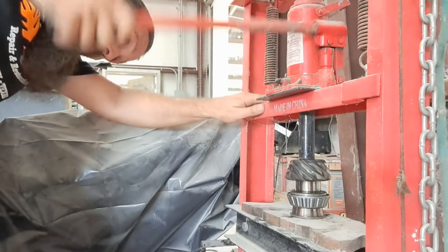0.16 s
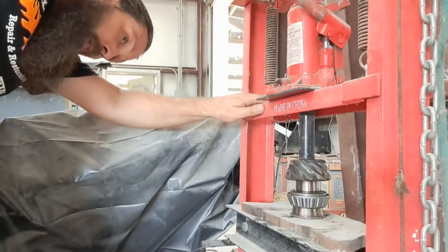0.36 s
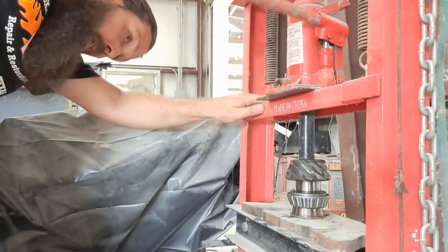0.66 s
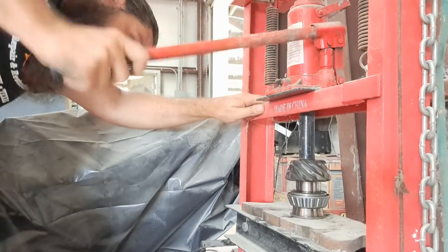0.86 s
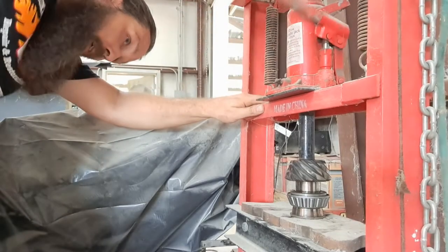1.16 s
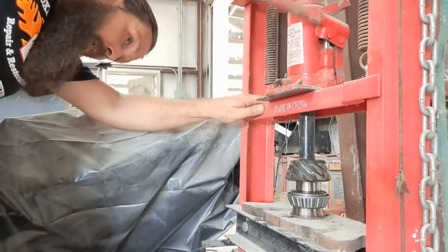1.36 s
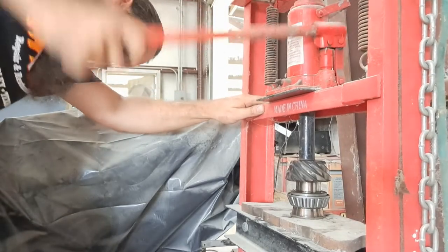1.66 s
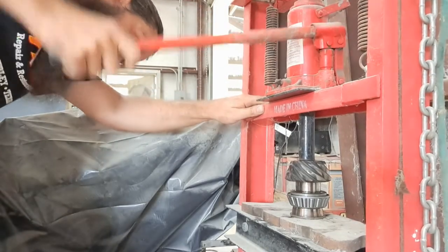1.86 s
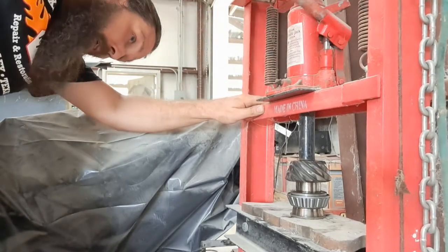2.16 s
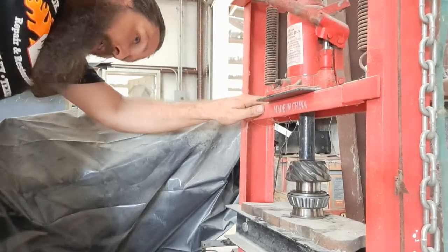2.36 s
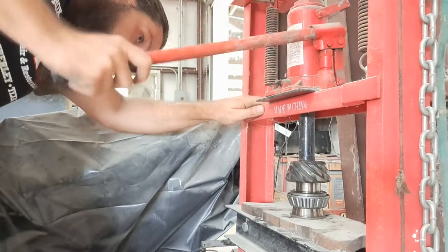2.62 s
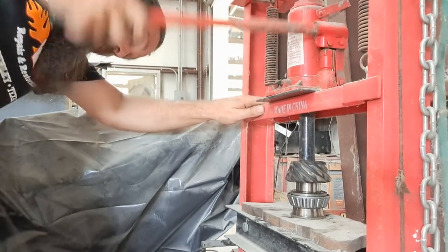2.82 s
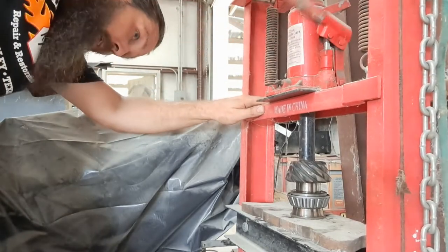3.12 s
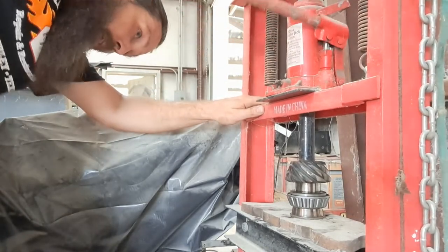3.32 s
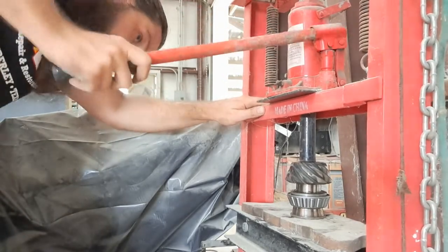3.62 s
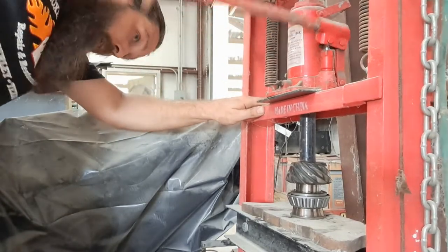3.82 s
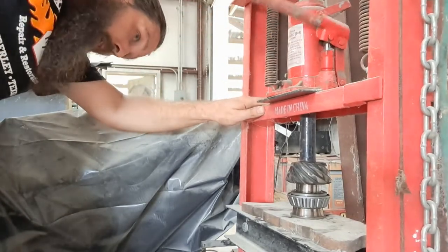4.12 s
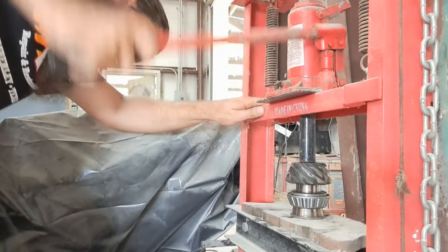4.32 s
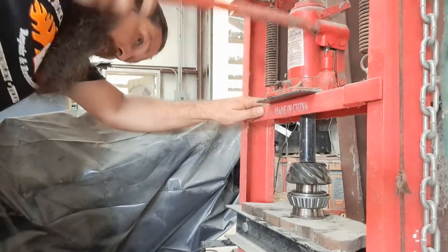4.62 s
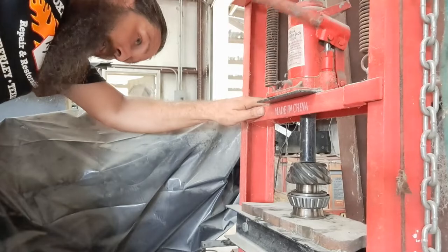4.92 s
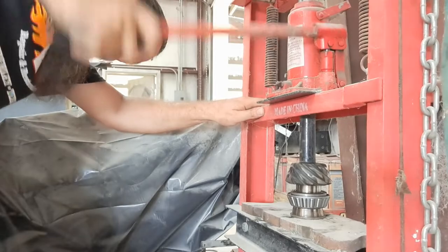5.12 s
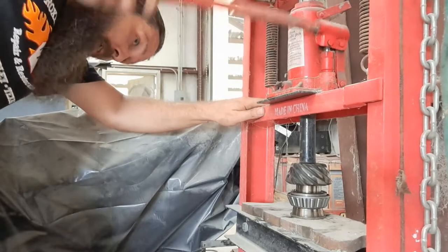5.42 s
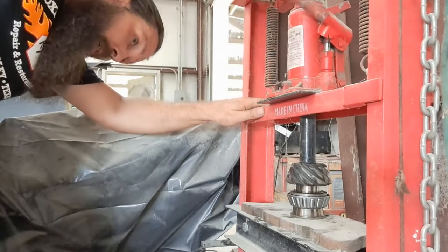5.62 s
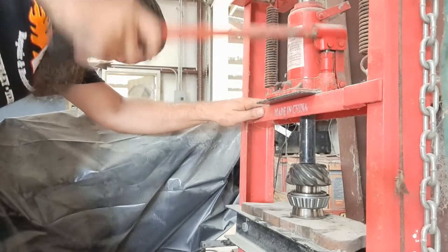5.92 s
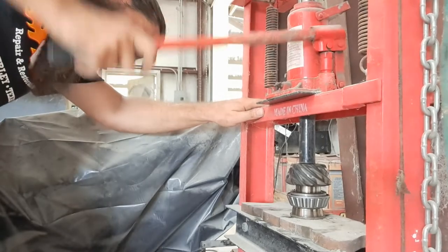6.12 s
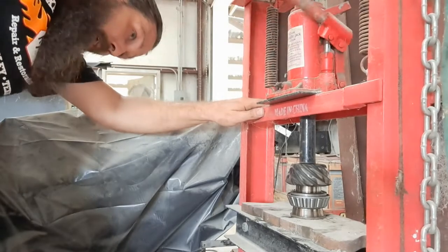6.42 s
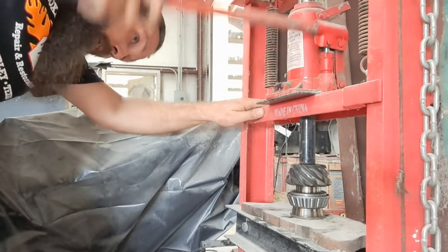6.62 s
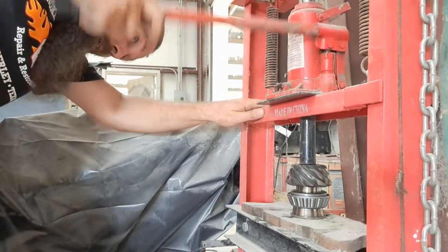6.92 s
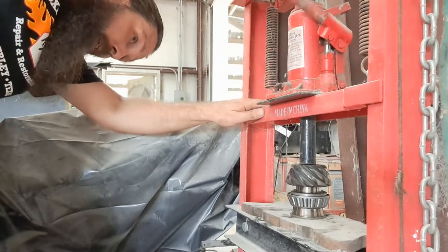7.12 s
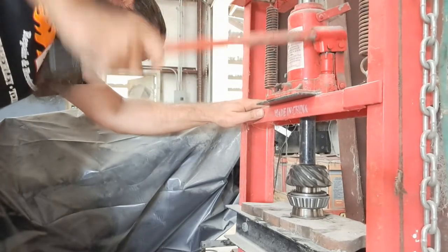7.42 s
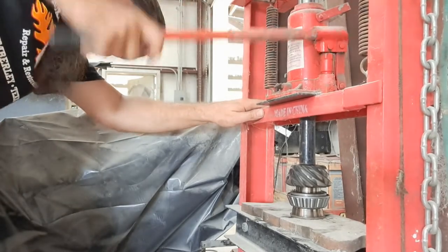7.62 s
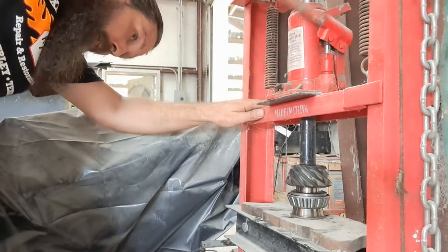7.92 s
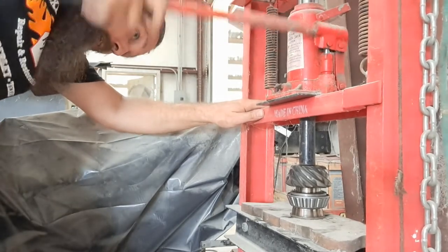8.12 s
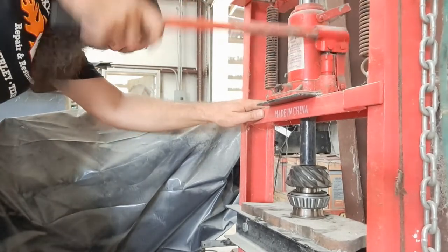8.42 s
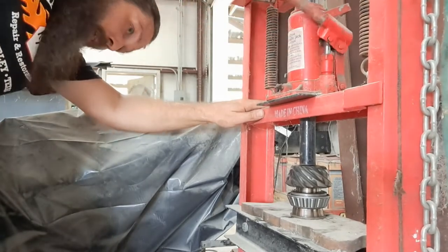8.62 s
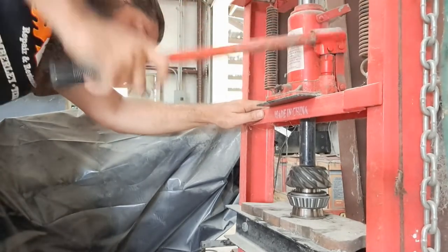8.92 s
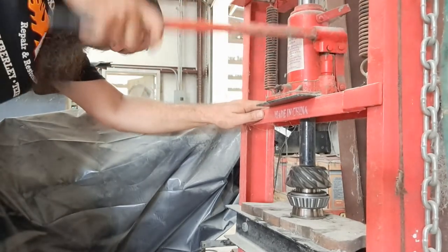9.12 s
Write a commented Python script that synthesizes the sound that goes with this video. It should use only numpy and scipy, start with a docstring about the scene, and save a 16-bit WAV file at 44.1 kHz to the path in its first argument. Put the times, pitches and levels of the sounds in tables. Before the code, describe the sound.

A low fan rushes and hums with wavering tones throughout, in a workshop heard close in stereo. Loose steel handle taps open the sound, a clear one at 0.2 s and a sharp, bright one near 0.9 s, with a hollow pump knock at 0.56 s. Knocks follow at 1.4, 2.3 and 3.2 s, each with a short scrape and, on these light strokes, a small rebound. Faint paired pin ticks come between, and single light frame clacks with a soft low thump land at 1.7, 2.6 and 3.55 s. At 4.3 s the clack doubles and hardens. From 5 s on, loud bursts of two to four steel jolts hit around 5.1, 5.9, 6.7, 7.4, 8.1 and 8.9 s, rattling brightly and ringing briefly, with quieter scrape, knock and ticks between them. A last faint pin tick comes near 9.2 s.

```python
"""A loose handle taps its socket over a fan's hum: a bottle jack in a steel shop press, pumped by hand,
heard close by in a workshop through two microphone ports.
Each stroke: the handle scrapes up, the pump knocks at the top, the push makes the frame clack, two pins tick.
As the load builds, one light clack a stroke becomes two to four loud jolts.
Contacts are shaped noise with decaying steel modes; the fan is rushing noise and wavering tones."""
import sys
import numpy as np
from scipy import signal
from scipy.fft import rfft, irfft
from scipy.io import wavfile

SR = 44100
rng = np.random.default_rng(int(sys.argv[2]) if len(sys.argv) > 2 else 0)


def generate_wav(sig):
    """Save sig (samples, or channels by samples) to the path in sys.argv[1] as 16-bit PCM at SR."""
    pcm = np.round(np.clip(np.atleast_2d(sig).T, -1, 1) * 32767).astype(np.int16)
    wavfile.write(sys.argv[1], SR, pcm)


N = 408366  # samples in the scene
LENGTH = 5 * 2 ** 13  # samples in one contact sound
AGE = np.arange(LENGTH) / SR  # seconds since the contact began
HZ = np.maximum(np.fft.rfftfreq(LENGTH, 1 / SR), 1)


# Share of the full load on the ram. Each row: time in seconds, share from 0 to 1.
RAM_LOAD = [(0, 0), (3.3, 0), (4.3, .3), (5.1, .55), (9.26, 1)]


def load_at(s):
    """Share of the full load on the ram at a time."""
    return np.clip(np.interp(s, *np.transpose(RAM_LOAD)), 0, 1)


# Frame jolts on the down strokes. Each row: start in seconds, level in dB before the layer's gain,
# bass boost in dB, treble boost in dB, contact in seconds.
FRAME_JOLTS = [(1.717, -26.5, -9, 0.5, 0.011), (2.634, -25, -7, 0.5, .0051), (3.55, -20.5, -3, 4.5, 0.027),
               (4.29, -17.5, -3.5, 4.5, 0.0088), (4.348, -16.5, -0.5, 2.5, 0.019),
               (5.041, -12.5, 1.5, 4.5, 0.016), (5.117, -10, 1, -1, 0.013),
               (5.185, -13.5, -1.5, -2.5, .017), (5.84, -10.5, -4, -5.5, 0.0098),
               (5.919, -16.5, 1.5, -1.5, 0.0097), (5.957, -12.5, -6.5, -3, 0.021),
               (6.591, -14, -0.5, -1, 0.027), (6.646, -12, -2.5, -2, .02), (6.714, -14.5, 3.5, 2.5, 0.0072),
               (6.755, -9.5, -6.5, -3, 0.0046), (7.362, -9.5, 0, 1, 0.011), (7.435, -10, -2, -2, 0.0069),
               (8.073, -8, -6, -5, 0.0047), (8.161, -16, -4.5, -2.5, .019), (8.222, -11.5, -4, -2.5, .0082),
               (8.804, -11.5, -3, -5, .016), (8.881, -13.5, 1, -1, 0.016), (8.947, -8, -8, -4.5, 0.0026)]
# Colour of a jolt. Each row: frequency in Hz, relative density in dB per Hz.
JOLT_COLOUR = [(110, -25), (180, -7), (394, 0), (493, -5.5), (652, -4.5), (756, -1.5), (928, -7),
               (1060, -6.5), (3620, -16.5), (4200, -17), (4530, -16.5), (5660, -19.5), (10100, -32.5),
               (11700, -27), (15500, -42.5)]
# Colour of the thump under it. Each row: frequency in Hz, relative density in dB per Hz.
THUMP_SPECTRUM = [(30, -32), (55, -11.5), (77, 2), (100, -3.5), (160, -4.5), (230, -10.5), (500, -53),
                  (1500, -84)]
SLACK_THUMP_DB, LOADED_THUMP_DB = -2, -24.5  # the load damps the thump; each jolt's bass boost is added
THUMP_T60_S = 0.73
BOOM_DB, BOOM_HZ, BOOM_T60_S = -26, 790, 1.4
RATTLE_HZ, RATTLE_RISE_S = 1800, 0.046


def frame_clacks(press):
    """The loaded frame jolts with a thump, its loose steel rattles an instant later, and the beams boom on."""
    out = np.zeros((2, N))
    low = signal.butter(2, BOOM_HZ, fs=SR, output="sos")
    dull = signal.butter(1, RATTLE_HZ, fs=SR, output="sos")
    for s, db, bass_db, treble_db, contact in FRAME_JOLTS:
        colour = at_hz(JOLT_COLOUR, HZ)
        colour = colour + bass_db * (1 - shelf(900)) + treble_db * shelf(3500)
        hit = blow(press, colour, contact, attack=.0025, t60=0.18, modes_db=-5.5,
                   room_db=-10.0, grain_db=0.5, crack_db=-1.0)
        # the hit starts dull, and its treble rattle fades in
        late_rattle = hit - signal.sosfilt(dull, hit)
        hit = hit - late_rattle * dying(RATTLE_RISE_S)

        boom_noise = signal.sosfilt(low, stereo_noise(LENGTH))
        boom = coloured(boom_noise * dying(BOOM_T60_S), colour)
        thump = coloured(stereo_noise(LENGTH) * dying(THUMP_T60_S), at_hz(THUMP_SPECTRUM, HZ))
        thump_db = bass_db + np.interp(load_at(s), [0, 1], [SLACK_THUMP_DB, LOADED_THUMP_DB])
        add(out, s, from_db(db) * (hit + from_db(BOOM_DB) * boom + from_db(thump_db) * thump))
    return out


# Colour of the pump's knock. Each row: frequency in Hz, relative density in dB per Hz.
PUMP_KNOCK_COLOUR = [(320, -12.5), (550, -27), (809, 1), (1180, -8), (1500, -2), (1730, -1), (1990, -9.5),
                     (2460, -22), (3530, -16), (5700, -51), (6490, -32), (9000, -26.5), (11700, -96),
                     (19800, -120)]
# The pump body's ring after its knock. Each row: frequency in Hz before a slight random detuning,
# relative level in dB, t60 in seconds.
PUMP_BODY_MODES = [(815, -11.5, .25), (968, -21, 0.39), (1475, -4.5, 0.22), (1960, -11, .2)]


def knock(press):
    """A hollow, dull knock that leaves the pump body ringing."""
    colour = at_hz(PUMP_KNOCK_COLOUR, HZ) + 9 * (1 - shelf(600)) ** 2 - 4 * shelf(2600)
    sound = blow(press, colour, contact=0.0044, attack=0.00046, t60=0.17, modes_db=-13.5,
                 room_db=-11.5, grain_db=1.0, crack_db=-3.0)
    for hz, db, t60 in PUMP_BODY_MODES:
        detuned_hz = hz * rng.normal(1, 0.0072)
        sound = sound + from_db(db) * dying(t60) * np.sin(2 * np.pi * detuned_hz * AGE)
    return sound


# Lifts of the handle, played by the knocks and the scrapes, levels before each layer's gain.
# Each row: time at the top in seconds, knock level in dB, slide before the top in seconds,
# scrape level in dB, scrape's treble boost in dB, first touch before the slide in seconds.
HANDLE_LIFTS = [(.558, -26.5, 0.033, -35, 6, 0.0054), (1.398, -26.5, 0.052, -31, -2, 0.016),
                (2.305, -28.5, 0.04, -24.5, 1, 0.03), (3.204, -24, 0.037, -27.5, 0, 0.029),
                (4.135, -26, 0.023, -26.5, -2, 0.043), (4.943, -25.5, 0.029, -27.5, 0, 0.011),
                (5.733, -24.5, 0.021, -25.5, 1.5, .034), (6.517, -26, 0.021, -24.5, -1, 0.017),
                (7.257, -25.5, 0.026, -29, 1.5, 0.0092), (7.99, -23.5, 0.027, -27.5, 0.5, .012),
                (8.75, -28.5, 0.011, -37.5, -3, 0.026)]
QUICK_FROM_S, QUICK_TO_S = 1, 3.5  # the quick, unloaded strokes
REBOUND_S, REBOUND_DB = .072, -7  # delay and level against the knock


def pump_knocks(press):
    """The pump knocks at the top of every lift, and bounces once after it on the quick strokes."""
    out = np.zeros((2, N))
    for s, db, *_ in HANDLE_LIFTS:
        add(out, s, from_db(db) * knock(press))
        if QUICK_FROM_S < s < QUICK_TO_S:
            add(out, s + REBOUND_S, from_db(db + REBOUND_DB) * knock(press))
    return out


# Colour of a light steel touch. Each row: frequency in Hz, relative density in dB per Hz.
TOUCH_COLOUR = [(320, -5), (550, -7), (780, -4), (1080, -6.5), (1380, -4), (1550, -7), (2250, -3.5),
                (2520, -5), (5290, -6), (6340, -12), (9910, -13.5), (10900, -8), (15500, -18.5)]


def clink(press, ping_db, top_db, contact, t60):
    """One light touch of steel on steel; a longer contact swells into a scrape."""
    ping_band = shelf(3000) - shelf(6500)
    colour = at_hz(TOUCH_COLOUR, HZ) + ping_db * ping_band + top_db * shelf(6500)
    colour = colour + 2.36 * ripple(161.8)  # each touching spot favours a few broad pitches
    return blow(press, colour, contact, attack=0.099 * contact, t60=t60, modes_db=-7.5,
                room_db=-14.5, grain_db=4.5, crack_db=-16.0)


# Pin ticks as the handle turns at the bottom. Each row: start in seconds,
# level in dB before the layer's gain, gap to the second pin in seconds.
PIN_TURNS = [(1.109, -42.5, .012), (1.882, -32.5, .021), (2.775, -35, 0.032), (3.727, -29.5, 0.072),
             (4.54, -34.5, 0.013), (5.366, -31.5, 0.047), (6.161, -29.5, 0.034), (6.9, -28, .034),
             (7.636, -35.5, 0.053), (8.41, -35, 0.046), (9.166, -33.5, 0.028)]
# Loose taps of the handle in its socket. Each row: start in seconds, level in dB before the layer's gain,
# boost in dB around 3 to 6 kHz, boost in dB above that.
LOOSE_TAPS = [(0.024, -32, -20, -24), (.082, -39, -11, -19), (0.137, -42, 2, -6), (.166, -34.5, 3, 5),
              (.196, -18, 7.5, -5), (0.452, -47, 20, -4), (.549, -24.5, 6, -17), (0.856, -27, -1, -20),
              (.873, -12, -1, 8.5), (.996, -32.5, 4, -19), (1.387, -19.5, 4, 7), (1.923, -28.5, 0, -7),
              (1.965, -26, 0, -4.5), (2.286, -20.5, -10, 2), (2.876, -26, -3, -7.5), (4.617, -23, 4.5, 3),
              (8.446, -28, -3, -3)]
FIRST_TOUCH_DB = -14  # against the scrape
RUB_SHARE = 0.38  # the handle rubs for this share of the slide
PIN_T60_S, SECOND_PIN_DB = .065, -2


def socket_clinks(press):
    """The handle slides in its socket on every lift, ticks two pins at every turn, and at times taps loosely."""
    out = np.zeros((2, N))
    for top, _, slide, db, top_db, slack in HANDLE_LIFTS:
        # a faint touch takes up the slack before each scrape
        touch = clink(press, ping_db=-3, top_db=top_db - 12.5, contact=0.011, t60=.2)
        scrape = clink(press, ping_db=-2.5, top_db=top_db, contact=RUB_SHARE * slide, t60=0.16)
        add(out, top - slide - slack, from_db(db + FIRST_TOUCH_DB) * touch)
        add(out, top - slide, from_db(db) * scrape)
    for s, db, gap in PIN_TURNS:
        first = clink(press, ping_db=9, top_db=-0.5, contact=0.0021, t60=PIN_T60_S)
        second = clink(press, ping_db=1, top_db=-1.5, contact=0.0046, t60=PIN_T60_S)
        add(out, s, from_db(db) * first)
        add(out, s + gap, from_db(db + SECOND_PIN_DB) * second)
    for s, db, ping_db, top_db in LOOSE_TAPS:
        add(out, s, from_db(db) * clink(press, ping_db, top_db, contact=0.0024, t60=0.12))
    return out


# Clear modes of the steel press. Each row: frequency in Hz, relative level in dB, t60 in seconds.
STEEL_MODES = [(303, -25, .9), (350, -26, .5), (397, -27, .9), (463, -32, 1.1), (573, -22, .3),
               (700, -29, .7), (756, -16.5, .3), (871, -21, .35), (1081, -24, .25), (1324, -24, .3),
               (1545, -21, .35), (1185, -28, .75), (1630, -30, .7), (1790, -25, .5), (2137, -28, .55),
               (2369, -19.5, .35), (3026, -20, .28), (3874, -20, .25), (4305, -15, .25), (4701, -17, .25),
               (5113, -15.5, .25), (5590, -17, .2), (5718, -14.5, .22), (6140, -18, .2), (6256, -14, .22),
               (6686, -16, .22), (7403, -15, .25), (7784, -16.5, .22), (13810, -14, .3)]


def steel():
    """The press's own ring: a thicket of short resonances, and the clear modes as each port hears them."""
    hz, db, t60 = np.transpose(STEEL_MODES)
    # the ports' phases part towards the treble
    spread = np.minimum(hz / 3500, 1) * rng.choice([-1, 1], len(hz))
    phase = rng.uniform(0, 2 * np.pi, len(hz)) + np.array([spread, -spread])
    decay = np.array([from_db(level) * dying(t) for level, t in zip(db, t60)])
    modes = np.sqrt(2) * decay * np.sin(2 * np.pi * hz[:, None] * AGE + phase[:, :, None])
    thicket_db = 3.5 * ripple(34)
    return thicket_db, modes.astype(np.float32)


ROOM_T60_S, WALL_CUT_HZ = 0.56, 12400


def blow(press, colour_db, contact, attack, t60, modes_db, room_db, grain_db, crack_db):
    """Steel chatters on steel and seats with a crack; the frame rings on and the room answers."""
    thicket_db, modes = press
    # tiny impacts, under a millisecond apart, roughen the start
    impacts = np.repeat(rng.standard_normal(LENGTH // 32), 32)
    roughness = rms_one(from_db(grain_db * impacts))
    grain = 1 + (roughness - 1) * dying(0.14, contact)
    dense = stereo_noise(LENGTH) * grain * dying(t60, contact)

    damping = np.exp(-2 * np.pi * WALL_CUT_HZ / SR)
    room = signal.lfilter([1 - damping], [1, -damping], stereo_noise(LENGTH))
    room = room * dying(ROOM_T60_S)

    # every blow lands in another place and wakes the resonances in other proportions
    count = len(STEEL_MODES)
    strengths = from_db(modes_db) * rng.uniform(.5, 1.4, count) * rng.choice([-1, 1], count)
    clear_ring = strengths.astype(np.float32) @ modes
    place_db = 2.5 * ripple(88.9)
    ringing = dense + from_db(room_db) * room + clear_ring
    ringing = ringing * (1 - np.exp(-AGE / max(attack, 1e-4)))

    # the crack reaches both ports straight from the contact, untouched by the frame's resonances
    crack = rng.standard_normal(LENGTH) * dying(0.0062, contact / 2) * (AGE > contact / 2)
    return coloured(ringing, colour_db + thicket_db + place_db) + from_db(crack_db) * coloured(crack, colour_db)


# Rushing air of the fan. Each row: frequency in Hz, relative density in dB per Hz.
FAN_AIR = [(25, -25), (40, -26), (55, 1.5), (75, 3), (100, -7), (125, -4.5), (200, -10.5), (270, -7),
           (330, -7.5), (400, -12.5), (620, -22.5), (850, -19.5), (1100, -32.5), (15500, -53)]
# Motor tones of the fan. Each row: frequency in Hz, rms level in dB before wavering.
FAN_TONES = [(59.2, -50), (118.4, -54), (269.2, -46.5), (296.1, -49), (323, -50.5), (347, -63.5)]
AIR_DB = -41  # rms
WAVER = 0.53  # spread of the random swell, and of the phase slip before its factor of 3


def workshop():
    """A fan behind the press: low rushing air and a few wavering motor tones."""
    air_gain = from_db(at_hz(FAN_AIR, np.fft.rfftfreq(N, 1 / SR)))
    air = irfft(rfft(stereo_noise(N)) * air_gain, N)
    t = np.arange(N) / SR
    knots = np.linspace(0, t[-1], 50)
    hum = 0
    for hz, db in FAN_TONES:
        swell = np.interp(t, knots, WAVER * rng.standard_normal(len(knots)))
        slip = np.interp(t, knots, WAVER * rng.standard_normal(len(knots)))
        tone = np.sin(2 * np.pi * hz * t + 3 * slip)
        hum = hum + np.sqrt(2) * from_db(db) * (1 + swell) * tone
    return from_db(AIR_DB) * rms_one(air) + hum


# Width at the microphone ports. Each row: frequency in Hz, side minus mid in dB.
PORT_WIDTH = [(60, -21), (300, -8.5), (750, -7.5), (1200, -3), (2200, 0.5), (15000, 1)]


def stereo_noise(size):
    """White noise, alike at both ports in the bass and diffuse in the treble."""
    mid, side = rng.standard_normal((2, size))
    side_gain = from_db(at_hz(PORT_WIDTH, np.fft.rfftfreq(size, 1 / SR)))
    side = irfft(rfft(side) * side_gain, size)
    return np.array([mid + side, mid - side])


# The press's direction at the microphone ports. Each row: frequency in Hz, left minus right in dB.
PORT_LEAN = [(60, 3), (99, 2.5), (160, -1), (270, 1.5), (450, 2.5), (740, -0.5), (1220, -1.5), (2010, -1),
             (3330, -7.5), (5500, 1), (9080, 8.5), (15000, -11.5)]
RIGHT_LAG_S = .00007


def coloured(x, curve_db):
    """Causal (minimum-phase) filter that keeps the power of white noise, heard from the press's direction."""
    cepstrum = irfft(np.log(rms_one(from_db(curve_db)) + 1e-5))
    # folding the cepstrum forward in time makes the filter causal
    cepstrum[1:LENGTH // 2] *= 2
    cepstrum[LENGTH // 2 + 1:] = 0
    lean = at_hz(PORT_LEAN, HZ) / 2
    lag = np.exp(-2j * np.pi * HZ * RIGHT_LAG_S)
    ports = np.array([from_db(lean), from_db(-lean) * lag])
    return irfft(rfft(x) * np.exp(rfft(cepstrum)) * ports)


def ripple(spacing_hz):
    """Random peaks and dips across the spectrum: crowded resonances, broader towards the treble."""
    place = np.log1p(HZ / 3000) * 3000 / max(spacing_hz, 20)
    heights = np.clip(rng.standard_normal(400), -2, 1.5)
    return np.interp(place, np.arange(len(heights)), heights) * shelf(900)


def shelf(corner_hz):
    """Rises from 0 below the corner to 1 above it."""
    return 1 / (1 + (corner_hz / HZ) ** 4)


def dying(t60, hold=0):
    """Full strength while the contact lasts, then an exponential decay."""
    return from_db(-60 * np.maximum(AGE - hold, 0) / t60)


def at_hz(points, hz):
    """Read a spectrum table on a log-frequency axis."""
    f, value = np.transpose(points)
    return np.interp(np.log(np.maximum(hz, 1)), np.log(np.maximum(f, 1)), value)


def from_db(db):
    """Decibels to gain."""
    return 10 ** (np.asarray(db) / 20)


def rms_one(x):
    """Scale to an rms of one."""
    return x / np.sqrt(np.mean(x ** 2) + 1e-20)


def add(out, s, sound):
    """Mix a sound in at a time in seconds."""
    at = max(round(s * SR), 0)
    out[:, at:at + LENGTH] += sound[:, :N - at]


def scene():
    """All contacts sound through the same steel press, with the fan behind."""
    press = steel()
    clacks = from_db(0.68) * frame_clacks(press)
    knocks = from_db(4.2) * pump_knocks(press)
    clinks = from_db(-0.48) * socket_clinks(press)
    return clacks + knocks + clinks + workshop()


def record(dry):
    """The highest peaks are rounded and the top is cut above 15.8 kHz."""
    rounded = dry / (1 + dry ** 6) ** (1 / 6)
    top_cut = signal.ellip(10, .1, 80, 15800, fs=SR, output="sos")
    return signal.sosfilt(top_cut, rounded)


dry = scene()
out = record(dry)
generate_wav(out)
```